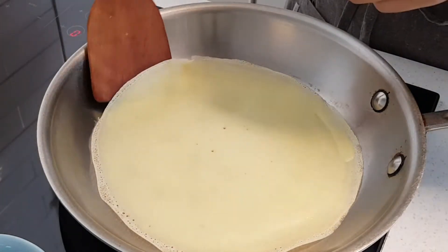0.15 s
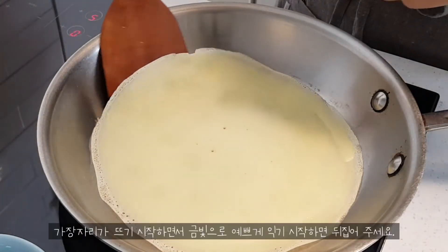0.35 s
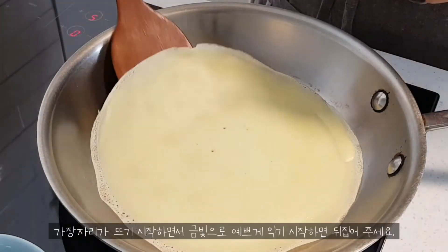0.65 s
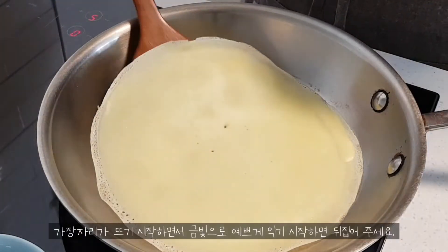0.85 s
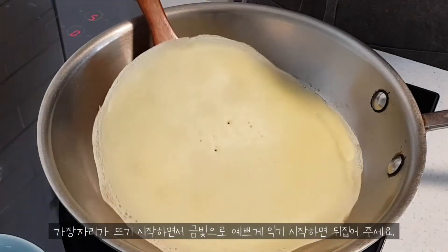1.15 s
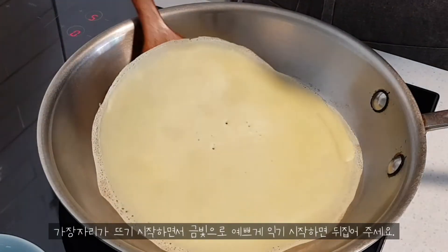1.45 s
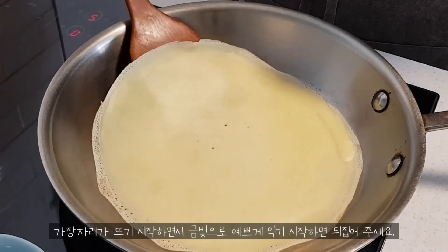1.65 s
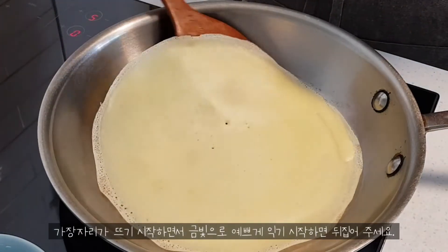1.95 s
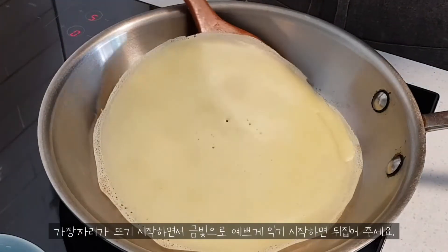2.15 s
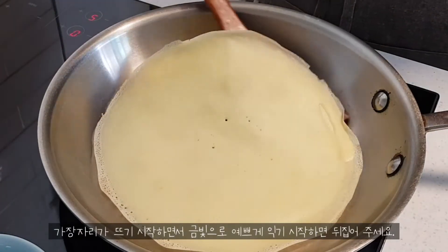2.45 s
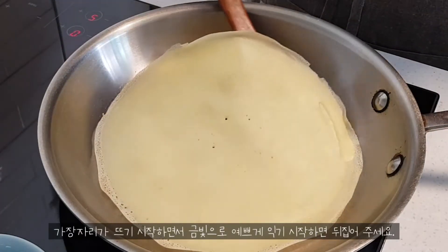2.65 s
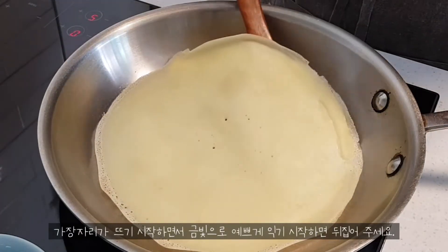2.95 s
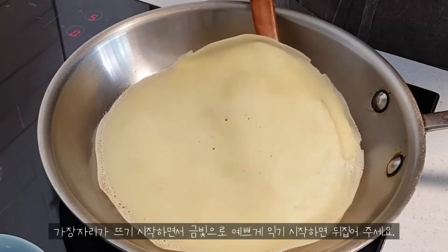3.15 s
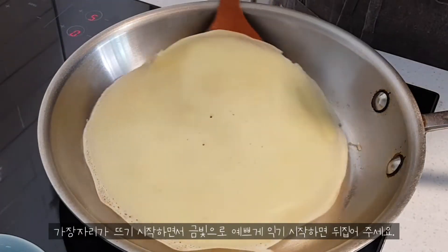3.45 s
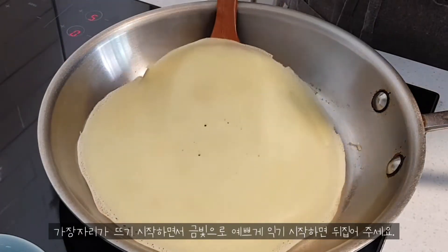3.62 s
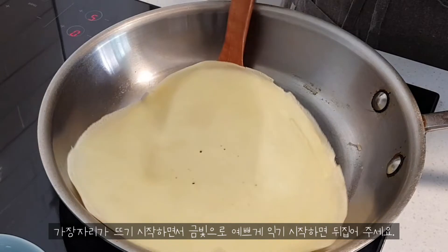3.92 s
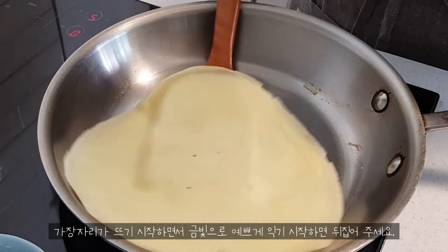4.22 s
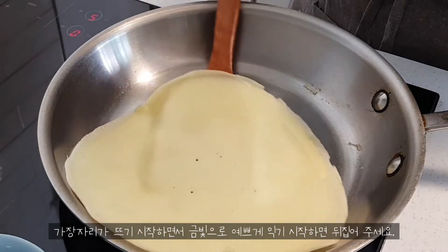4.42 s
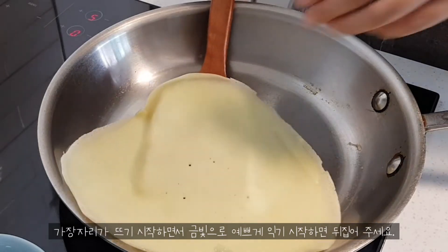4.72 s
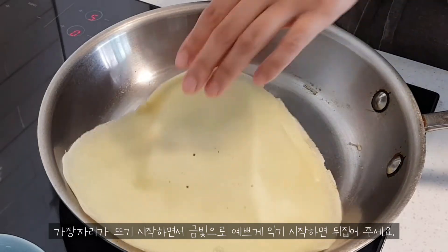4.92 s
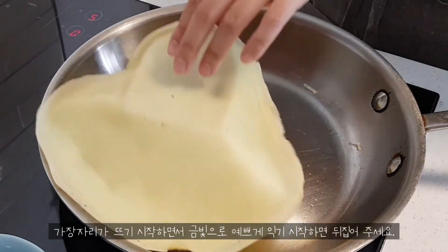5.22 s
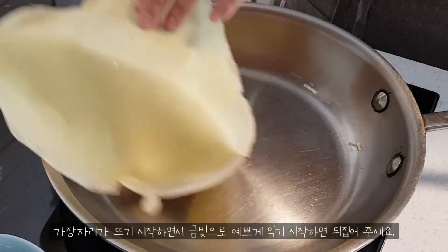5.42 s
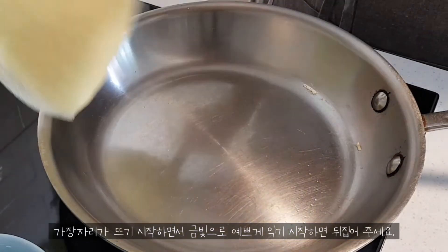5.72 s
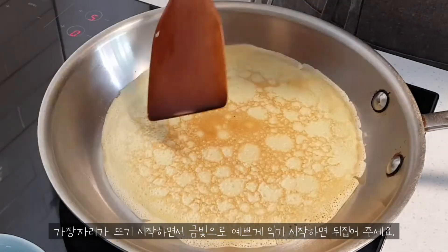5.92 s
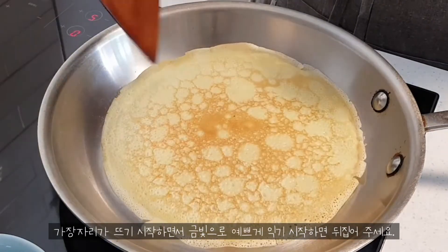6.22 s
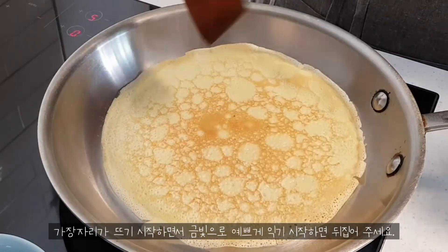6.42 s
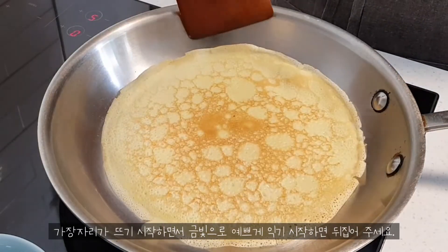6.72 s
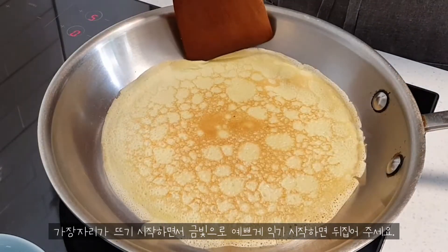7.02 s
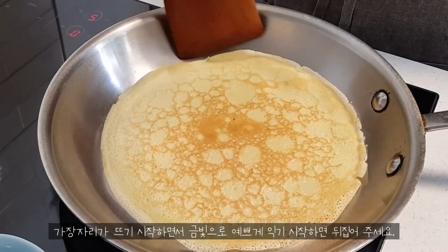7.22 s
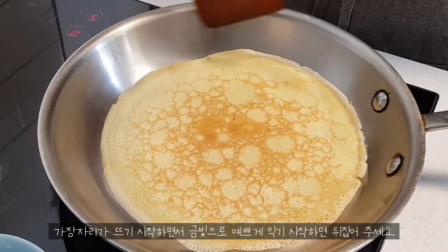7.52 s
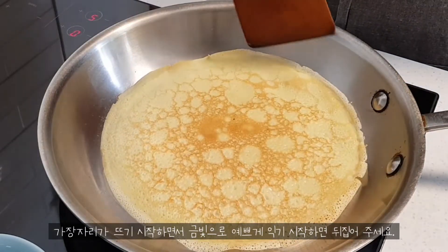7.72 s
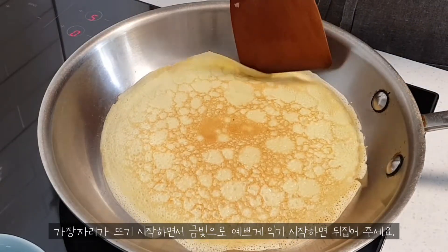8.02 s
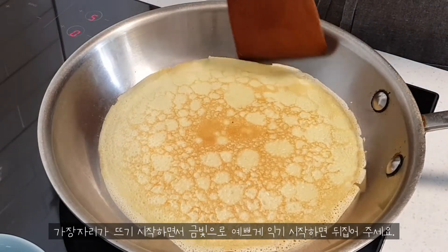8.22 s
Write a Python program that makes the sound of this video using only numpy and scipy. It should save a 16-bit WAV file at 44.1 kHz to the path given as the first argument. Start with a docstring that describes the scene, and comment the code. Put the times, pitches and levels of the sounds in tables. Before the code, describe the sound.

A steady, low, slightly wavering extractor hum and a faint hiss of hot fat run throughout in a small, short-echo kitchen. At 0.2 s a wooden spatula cracks against the steel pan wall with a short damped clang, and the pan thuds softly on the stove, again around 1.0 to 1.3 s. Two close knocks come at 1.5 to 1.6 s. Until about 4.8 s, brief gritty scrapes with fluttering metallic singing alternate with tiny crisp spits. From 4.0 to 4.8 s the handle rattles on the rim in quick hollow woody taps. Things grow quieter until 5.9 s, when the pancake lands in a soft, lumpy wet slap. Fresh sizzle and rustle swell unevenly. Lighter knocks follow at 6.6, 7.6 and 7.7 s, with a very faint dull one at 8.0 s. Close stereo, with the left stronger.

```python
"""A small kitchen: a wooden spatula works a thin pancake loose in a steel frying pan over an extractor hum.
The spatula knocks the wall (noisy crack, pan modes), slides (rubbing noise, treble hiss, blade resonances)
and rattles on the rim (short wood modes). The flipped pancake slaps down in noise puffs; fat sizzles as lumpy
noise and spits in ticks; the pan thuds on the stove. Two spaced microphones, the right one much weaker."""
import sys
import numpy as np
from scipy import signal
from scipy.fft import rfft, irfft, next_fast_len
from scipy.io import wavfile
from scipy.ndimage import uniform_filter1d, map_coordinates

SR = 44100
rng = np.random.default_rng(int(sys.argv[2]) if len(sys.argv) > 2 else 0)


def store_wav(level_fs):
    """Save 16-bit WAV to argv[1]."""
    pcm = np.round(np.clip(np.atleast_2d(level_fs), -1, 1) * 32767)
    wavfile.write(sys.argv[1], SR, pcm.T.astype(np.int16))


N = 368676

# All levels are relative: a sound may add an offset, and record() lifts the whole mix.
# Steady frying, down while the pancake is in the air, fresh after it lands:
# [t/s, sizzle level/dB, lower rustle level/dB]
FRYING_LEVELS = [(0, -74, -76), (2.2, -84, -81), (2.3, -68, -67), (3.6, -62, -72), (3.68, -75, -84),
                 (4.0, -65, -68), (4.8, -76, -64), (4.9, -71, -82), (5.24, -68.5, -78.5), (5.3, -85, -81.5),
                 (5.7, -79, -78), (5.87, -57.5, -70), (6.0, -63, -60), (6.2, -56, -58), (6.6, -65, -74.5),
                 (6.8, -63, -65.5), (6.95, -58.5, -66.5), (7.35, -61.5, -66), (7.55, -67.5, -77),
                 (7.85, -56.5, -55), (8.0, -59, -75), (8.2, -60.5, -68.5), (8.36, -70, -77)]
# The blade slides under the edge: [t/s, length/s, rubbing level/dB, treble hiss level/dB, swell/(dB/s),
# lower singing/dB against rubbing, upper singing/dB against rubbing]
BLADE_STROKES = [(0, 0.06, -63.5, -72, -30, 0.5, -22), (0.252, 0.17, -55.5, -48.5, -19, -3.5, -22),
                 (0.493, 0.14, -66.5, -55.5, 42, -1, -18), (0.685, 0.07, -53.5, -53, 9, -13, -19),
                 (0.884, 0.079, -54.5, -49.5, 10, -8.5, -11), (1.043, 0.043, -62.5, -61.5, 5, -4.5, -17),
                 (1.164, 0.022, -58.5, -60, 5, -7, -17), (1.272, 0.064, -60, -59.5, -30, -3, -17),
                 (1.393, 0.17, -66.5, -64.5, 53, -5, -4), (1.62, 0.12, -61, -57, -15, 0, -15),
                 (1.792, 0.062, -59.5, -54, 22, -4, -16), (1.93, 0.099, -67, -62, -13, -4, -20),
                 (2.09, 0.041, -61, -57, 20, -1.5, -22), (2.259, 0.12, -65.5, -58, -20, -9, -25),
                 (2.435, 0.11, -60, -56, -49, -2.5, -24), (2.624, 0.053, -65.5, -55, 5, -2, -22),
                 (2.75, .08, -68.5, -66, -10, 2, -20), (2.85, 0.023, -59, -53, 5, -1.5, -20),
                 (3.005, 0.069, -63.5, -63, 67, -2.5, -29), (3.118, 0.14, -71.5, -60.5, 7, 1, -21),
                 (3.293, 0.15, -60, -62.5, 9, -0.5, -19), (3.47, 0.15, -59.5, -61.5, -22, -8, 0),
                 (3.733, 0.045, -58.5, -56.5, -10, -1.5, -5), (3.888, 0.033, -62, -56.5, -10, -5, -6),
                 (4.007, 0.03, -61.5, -54, 5, 3, -15), (4.12, 0.095, -55.5, -55.5, 3, 0.5, -8),
                 (4.264, 0.22, -62.5, -56, -8, 0, -18), (4.457, 0.31, -63, -60.5, -12, -6, -28)]
# Likeness of the two microphones: [f/Hz, likeness 0 to 1]
MIC_LIKENESS = [(60, 0.84), (150, 0.97), (380, 0.77), (950, 0.086), (2400, 0.042), (6000, .01)]


def amp(db):
    """Gain of a level in dB."""
    return 10 ** (np.asarray(db) / 20)


def unit(x):
    """x at rms 1."""
    return x / np.sqrt(np.mean(x ** 2) + 1e-20)


def along(points, hz):
    """(Hz, value) points read on a log frequency axis."""
    f, v = np.transpose(points)
    return np.interp(np.log(hz + 1), np.log(f + 1), v)


def wobble(rate):
    """A smooth random curve, rate knots a second."""
    knots = rng.standard_normal(int(N * rate / SR) + 4)
    return map_coordinates(knots, [np.arange(N) * rate / SR])


def filtered(x, response):
    """x filtered by a response over frequency."""
    m = next_fast_len(x.shape[-1] + 8192)
    spectrum = rfft(x, m) * response(np.fft.rfftfreq(m, 1 / SR))
    return irfft(spectrum, m)[..., :x.shape[-1]]


def tilt(db_octave, low_hz):
    """A spectral slope about 1 kHz with the bass taken out below low_hz."""
    def response(hz):
        slope = amp(db_octave * np.log2(np.maximum(hz, low_hz) / 1000))
        return slope * hz ** 2 / np.sqrt(hz ** 4 + low_hz ** 4)
    return response


def resonance(hz, centre_hz, half_width_hz):
    """Gain of a band that falls to half at half_width_hz from its centre."""
    return 1 / (1 + ((hz - centre_hz) / half_width_hz) ** 2)


def hump(hz, centre_hz, curve_db):
    """Gain of a band that falls by curve_db one octave from its centre, four times that at two."""
    return amp(-curve_db * np.log2((hz + 1) / centre_hz) ** 2)


def mic_angle(hz):
    """Angle between the microphones, from their likeness."""
    return np.arccos(np.clip(along(MIC_LIKENESS, hz), 0, 1))


def rush(gain, size=N):
    """Coloured noise of rms 1 at both microphones, alike in the bass and nearly unrelated in the treble."""
    def mid_side(hz):
        turn = mic_angle(hz) / 2
        return gain(hz) * [np.cos(turn), np.sin(turn)]
    mid, side = filtered(rng.standard_normal((2, size)), mid_side)
    return unit(np.array([mid + side, mid - side]))


def ring(hz, db, t60, t, attack=0.001):
    """One dying mode; its phase differs more between the microphones where they are less alike."""
    apart = mic_angle(hz) * rng.choice([-.5, .5])
    phase = 2 * np.pi * (hz * t + rng.random()) + np.array([[apart], [-apart]])
    return amp(db - 60 * t / t60) * (1 - np.exp(-t / attack)) * np.sin(phase)


def add(track, s, sound):
    """Mix a sound into the track at s seconds."""
    part = track[:, round(s * SR):][:, :sound.shape[1]]
    part += sound[:, :part.shape[1]]


def level(rows):
    """Gain per sample for each dB column of a curve."""
    s, *columns_db = np.transpose(rows)
    return [amp(np.interp(np.arange(N) / SR, s, db)) for db in columns_db]


def stroking(levels_db):
    """Gain per sample: each stroke rises, swells or fades along its length, and dies away."""
    rise_db_per_s, fall_db_per_s = 399, 320
    t, power = np.arange(0, N, 32) / SR, 0
    for (s, length, _, _, swell_db, *_), db in zip(BLADE_STROKES, levels_db):
        before = rise_db_per_s * np.maximum(s - t, 0)
        after = fall_db_per_s * np.maximum(t - s - length, 0)
        swell = swell_db * np.clip(t - s, 0, length)
        power = power + amp(db + swell - before - after) ** 2
    return np.interp(np.arange(N) / SR, t, np.sqrt(power))


def treble_gain():
    """Gain of the treble hiss: frying, plus the blade's hiss against the crisp edge in each stroke."""
    hiss_db = np.transpose(BLADE_STROKES)[3]
    return np.hypot(level(FRYING_LEVELS)[0], stroking(hiss_db))


def kitchen(x):
    """The room's answer, 5 ms late: noise in which each frequency dies at its own speed."""
    # Reverberation: [f/Hz, t60/s]
    room_decay = [(200, 0.57), (2000, 0.13), (10000, 0.17)]
    hz, t, z = signal.stft(rush(np.ones_like, SR // 2), SR, nperseg=256)
    decay = amp(-60 * t / along(room_decay, hz)[:, None])
    tail = signal.istft(z * decay, SR, nperseg=256)[1]
    late = np.pad(x, ((0, 0), (220, 0)))
    return signal.fftconvolve(late, tail / np.linalg.norm(tail[0]), axes=1)[:, :N]


def fan():
    """Extractor fan: broad air noise with fuzzy hum bands that waver in level."""
    # Colour of the steady air noise: [f/Hz, level/dB]
    air_colour = [(12, -40.5), (20, -26.5), (54, -5), (85, -14), (119, -2.5), (147, -10.5), (267, -16.5),
                  (303, -20.5), (504, -26.5), (637, -21), (709, -31), (1130, -28.5), (3200, -61),
                  (4160, -100), (7040, -120)]
    # Fuzzy hum bands: [f/Hz, half-width/Hz, level/dB]
    hum_bands = [(60.4, 6.9, -54.5), (114.8, 3.7, -54.5), (222.2, 15.5, -65.5), (274.2, 20.5, -64.5),
                 (624, 26, -78)]
    air = amp(-52.5 + 1.1 * wobble(4.7)) * rush(lambda hz: amp(along(air_colour, hz)))
    for centre_hz, half_width, db in hum_bands:
        hum = rush(lambda hz: resonance(hz, centre_hz, half_width))
        air += amp(db + 2.2 * wobble(2.5)) * hum
    return air


def sizzle():
    """Frying and the blade's treble hiss: noise in dense tiny bursts, over a faint steady hiss of hot fat."""
    # Colour of the bursts: [f/Hz, level/dB]
    burst_colour = [(1470, -37), (2500, -11.5), (3830, -7), (4410, -6.5), (6860, -10), (7830, -1),
                    (13000, -1), (14900, -4), (16000, -12)]
    # Colour of the faint hiss of hot fat: [f/Hz, level/dB]
    hiss_colour = [(1650, -37.5), (2800, -15.5), (7070, -12), (8300, -3.5), (14900, -2), (16000, -4.5)]
    bursts = amp(0.52 * wobble(45) + 1.6 * wobble(400) + 2.0 * wobble(15))
    steady = amp(-72.5) * rush(lambda hz: amp(along(hiss_colour, hz)))
    return steady + treble_gain() * unit(bursts * rush(lambda hz: amp(along(burst_colour, hz))))


def spits():
    """Spits of fat and other small ticks: each a sharp noise tick with a short hiss in the same band."""
    # Single spits and ticks, loud and faint, with two small rustles at 6.298 and 7.045 s:
    # [t/s, level/dB, centre f/Hz]
    single_ticks = [(.5383, -29, 14600), (0.617, -28, 10900), (0.778, -29, 13000), (0.888, -35, 10700),
                    (.9715, -41, 10700), (1.8117, -31, 14700), (1.8452, -29.5, 11900), (2.3034, -32, 15000),
                    (2.4125, -31, 12500), (2.53, -36, 13100), (2.6217, -31.5, 13400), (2.689, -26, 14600),
                    (2.7427, -36, 12100), (2.8675, -28.5, 4700), (2.989, -35.5, 13600),
                    (3.0577, -33.5, 8280), (3.1152, -23, 14300), (3.187, -31, 12500), (3.3134, -34, 9050),
                    (4.148, -28, 12600), (4.296, -25.5, 13200), (4.368, -29, 14100), (4.4048, -19.5, 13000),
                    (5.2385, -48, 8600), (5.549, -37.5, 9800), (5.835, -39, 8130), (6.165, -26, 6400),
                    (6.298, -46, 4200), (6.4107, -31.5, 11100), (6.5028, -39, 9510), (6.867, -38.5, 7790),
                    (6.9205, -38.5, 4700), (6.952, -37, 9700), (7.045, -42, 3200), (7.337, -40, 10800),
                    (7.831, -33.5, 8100)]
    out, t = np.zeros((2, N)), np.arange(SR // 8) / SR
    gain = treble_gain()
    chance_ticks = []
    for when, strength, pitch in rng.random((60, 3)):  # at random times, following the treble hiss
        hiss_db = 20 * np.log10(gain[int(when * N)])
        chance_ticks.append((when * N / SR, hiss_db + 14 + 8 * strength, 8000 + 7000 * pitch))
    for s, db, centre_hz in single_ticks + chance_ticks:
        tick = amp(db - 26.5 - 60 * t / 0.005)
        hiss = amp(db - 12 - 60 * t / 0.049)
        add(out, s, rush(lambda hz: hump(hz, centre_hz, 6), len(t)) * (tick + hiss))
    return out


def bumps():
    """The pan shifts on the stove: soft low modes of the stove top, each with a dull rub of the pan's base."""
    # Bumps: [t/s, thud level/dB, lean to the higher modes/(dB/octave), rub level/dB]
    pan_bumps = [(.217, -33, 1.5, -39.5), (.985, -21, 9, -52.5), (1.036, -21, 8, -47),
                 (1.093, -26, -1, -62), (1.228, -29, 4, -49.5), (1.296, -33, 0, -75),
                 (1.528, -24, -1.5, -48), (2.459, -57, 7, -48), (2.521, -53, 6, -50), (4.04, -38, 2, -52),
                 (4.174, -38, -1.5, -52.5), (4.411, -40, .3, -51), (4.533, -38.5, -2, -52.5),
                 (4.765, -36, -4.5, -50.5), (5.913, -39.5, -8.5, -42), (7.271, -38, 1, -67),
                 (7.581, -37, 8, -50), (7.77, -41, 7, -47)]
    # Modes of the stove top: [f/Hz, t60/s]
    stove_modes = [(48, 0.18), (97, 0.17), (140, 0.19)]
    out, t = np.zeros((2, N)), np.arange(SR // 2) / SR
    for s, db, lean_db, rub_db in pan_bumps:
        thud = sum(ring(hz, db + lean_db * np.log2(hz / 97), t60, t, attack=0.0094)
                   for hz, t60 in stove_modes)
        rub = rush(lambda hz: hump(hz, 280, 14), len(t))
        rub_gain = amp(rub_db - 60 * t / 0.3) * (1 - np.exp(-t / 0.003))
        add(out, s, thud + rub_gain * rub)
    return out


def slap():
    """The pancake lands in stages: noise puffs of trapped air and wet contact, with no ring."""
    # Stages: [t/s, level/dB, rise/s, t60/s, brightness/(dB/octave)]
    landing = [(5.887, -44, .002, 0.11, 9), (5.896, -33.5, 0.0036, 0.14, 1.5),
               (5.909, -13.5, 0.0056, 0.059, -1.5), (5.917, -21, 0.001, 0.055, 1),
               (5.946, -26, 0.0076, 0.057, 0.5), (5.95, -44, 0.011, 0.45, -1)]
    # Colour of the puffs: [f/Hz, level/dB]
    puff_colour = [(180, -35), (300, -17), (787, -20.5), (1060, -4), (2100, -11), (2930, -6), (5700, -19.5),
                   (13100, -20), (16000, -29)]
    out, t = np.zeros((2, N)), np.arange(SR // 3) / SR
    for s, db, rise, t60, bright_db in landing:
        puff = rush(lambda hz: amp(along(puff_colour, hz) + bright_db * np.log2((hz + 1) / 1000)), len(t))
        # contacts come in lumps
        crackle = amp(7.75 * uniform_filter1d(rng.standard_normal(len(t)), size=16))
        envelope = amp(db - 60 * t / t60) * np.minimum(t / rise, 1)
        add(out, s, envelope * unit(crackle) * puff)
    return out


def scrape():
    """Gritty rubbing, also the rustle of frying; the blade sings in two groups of fluttering resonances."""
    # Colour of the rubbing: [f/Hz, level/dB]
    rub_colour = [(410, -44.5), (700, -11), (1130, -4), (1240, -2), (1480, -3.5), (1980, -5), (2780, -9.5),
                  (3820, -12), (4760, -8.5), (7000, -19.5), (9100, -37), (15400, -120)]
    # Blade on steel, lower then upper group of resonances: [f/Hz, half-width/Hz, level/dB]
    blade_groups = [
        [(1258, 21, -7.5), (1830, 90, -3.5), (1998, 43, -3), (2515, 56, -10)],
        [(4440, 120, -7.5), (4830, 130, -5)],
    ]
    _, _, rub_db, _, _, *groups_db = np.transpose(BLADE_STROKES)
    grit = amp(2.1 * wobble(60) + 1.8 * wobble(350) + 1.2 * wobble(12))
    rubbing = unit(grit * rush(lambda hz: amp(along(rub_colour, hz))))
    out = np.hypot(stroking(rub_db), level(FRYING_LEVELS)[1]) * rubbing
    for singing_db, group in zip(groups_db, blade_groups):
        gain = stroking(rub_db + singing_db)
        for centre_hz, half_width, db in group:
            slips = amp(2.5 * wobble(15) + 2.5 * wobble(90))  # each resonance slips in and out
            tone = rush(lambda hz: resonance(hz, centre_hz, half_width))
            out += gain * amp(db) * unit(slips * tone)
    return out


def taps():
    """The handle rattles on the rim: two low and two upper wood modes, a hollow knock and a click."""
    # Taps: [t/s, lowest mode level/dB, second mode level/dB, upper modes level/dB]
    rim_taps = [(1.162, -39, -34.5, -42.5), (1.262, -50, -42, -52), (3.746, -41, -68, -63),
                (3.999, -40.5, -44, -40), (4.037, -32.5, -52, -30), (4.089, -40.5, -43, -54),
                (4.113, -42.5, -55, -33), (4.172, -29, -33.5, -24.5), (4.23, -44.5, -54, -33.5),
                (4.297, -51, -53, -42), (4.353, -50, -55, -36), (4.413, -30.5, -43, -31),
                (4.463, -49, -63, -31.5), (4.532, -31.5, -46, -28.5), (4.577, -44, -54, -31),
                (4.656, -32.5, -37, -29.5), (4.697, -44, -53, -33.5), (4.767, -34, -36, -31.5)]
    # Modes of the spatula, lower pair then upper pair: [f/Hz, level/dB, t60/s]
    wood_modes = [(990, 1.5, .04), (1260, 1.5, .025), (1870, -1.5, .022), (2010, -1.5, .03)]
    out, t = np.zeros((2, N)), np.arange(SR // 6) / SR
    for s, db, second_db, upper_db in rim_taps:
        lifts_db = [db, second_db, upper_db, upper_db]
        detune = rng.normal(1, .015, size=len(wood_modes))
        # upper modes sink by 0.11 a second as the handle slides along the rim
        detune[2:] *= 1 - 0.11 * np.clip(s - 4.3, -.3, .5)
        sound = sum(ring(hz * d, mode_db + lift, t60, t, attack=0.00028)
                    for (hz, mode_db, t60), lift, d in zip(wood_modes, lifts_db, detune))
        # hollow knock: a noise band around each pair of modes
        sound += amp(upper_db - 10.5 - 60 * t / 0.054) * rush(lambda hz: hump(hz, 1900, 40), len(t))
        sound += amp(db - 14 - 60 * t / 0.085) * rush(lambda hz: hump(hz, 1000, 60), len(t))
        click = rush(tilt(-8.5, low_hz=2330), len(t))
        sound += amp(upper_db - 15.5 - 60 * t / 0.037) * click
        add(out, s, sound)
    return out


def knocks():
    """Wood on the steel wall: noisy crack, dull clang and woken pan modes, ducked 18 dB by the next blow."""
    # Blows: [t/s, crack level/dB, brightness/(dB/octave), damping by the blade (divides t60),
    # ring level/dB, height on the wall, slant of the blade, place round the rim]
    wall_blows = [(.217, -15, -0.5, 1.92, -37, -0.062, -1.48, -.1),
                  (1.53, -15, -5.5, 2, -38, 1.5, 0.16, -.35),
                  (1.597, -18, -2.5, 1.01, -43.5, 0.42, .06, 0.76),
                  (6.633, -23.5, -1.5, 0.93, -42.5, -0.5, 0.46, -0.27),
                  (7.576, -21, 1, 0.77, -45, -0.63, 0.37, -0.12),
                  (7.718, -24, -7.5, 1.83, -41, 0.46, 0.57, -0.34),
                  (8.033, -48, -20, 1.63, -53, -0.46, 0.73, -0.25)]
    # Modes of the pan, twelve long ones first: [f/Hz, t60/s before damping]
    pan_modes = [(328, .24), (420, .16), (657, .26), (781, .33), (985, .22), (1335, .34), (1990, .42),
                 (2350, .18), (2735, .36), (3542, .42), (4660, .2), (5780, .18), (255, .08), (1098, .07),
                 (1257, .08), (1536, .09), (1905, .17), (3900, .1), (5360, .11), (6965, .1), (8060, .07)]
    # How a blow wakes each long mode: [level/dB, dB per unit of height, of slant, of place]
    mode_waking = [(8.5, -6.5, -0.1, 3), (6, 2, -1.8, -13.5), (2.5, -1, 8, 2.5), (-3.5, -12.5, -4, -7),
                   (-1.5, 9.5, 5, 5.5), (5.5, 4.5, -2.1, -4.5), (-1.5, 4.5, -4.5, 9.5), (-3, -4, 2.2, 6.5),
                   (5, 0.2, 3.5, -6), (-7, 6, -5.5, 11), (1.9, 2, -8, 0.5), (-8.5, 5, -2, -8.5)]
    out, t = np.zeros((2, N)), np.arange(SR // 2) / SR
    next_blows = wall_blows[1:] + [[np.inf]]
    for (s, db, bright_db, damping, ring_db, height, slant, place), after in zip(wall_blows, next_blows):
        bright = tilt(bright_db, low_hz=750)
        crack = rush(lambda hz: bright(hz) / (1 + (hz / 12000) ** 4), len(t))
        clang = rush(tilt(bright_db - 6.5, low_hz=755), len(t))
        sound = amp(db - 6.5 - 60 * t / 0.065) * crack
        sound += amp(db - 17.5 - 60 * t / 0.21) * clang

        # a blow duller than -5 dB an octave also loses its high modes
        dull_db = min(bright_db + 5, 0)
        woken_db = []
        for (hz, _), (base, up, lean, turn) in zip(pan_modes, mode_waking):
            struck_db = base + height * up + slant * lean + place * turn
            woken_db.append(ring_db + struck_db + dull_db * np.log2(max(hz / 800, 1)))
        for hz, _ in pan_modes[len(mode_waking):]:  # short modes follow the crack
            woken_db.append(db - 19.5 - 3 * np.log2(hz / 1000) + rng.normal(0, 4.8))

        for (hz, t60), mode_db in zip(pan_modes, woken_db):
            # a round pan has close pairs of modes that beat
            beat = 1 + .45 * np.cos(2 * np.pi * (rng.uniform(10, 35) * t + rng.random()))
            sound += beat * ring(hz, mode_db, t60 / damping, t)
        mute = amp(-18 * np.clip((s + t - after[0]) / .03, 0, 1))
        add(out, s, sound * mute)
    return out


def scene():
    """Knocks, taps, slap and spits with their room, over bumps, sizzle, scraping and fan."""
    blows = knocks() + taps() + slap() + spits()
    return blows + amp(-11) * kitchen(blows) + bumps() + sizzle() + scrape() + fan()


def record(dry):
    """Both microphones get 4.5 dB of gain, the right one is weaker, and a steep low-pass cuts at 15.6 kHz."""
    # Right microphone against the left: [f/Hz, level/dB]
    right_mic = [(60, -10.5), (180, -6.5), (450, -14.5), (1200, -10), (5000, -11), (9000, -8.5),
                 (15000, -6.5)]

    def response(hz):
        mics = amp(4.5 + np.array([0 * hz, along(right_mic, hz)]))
        return mics / (1 + (hz / 15600) ** 300)
    return filtered(dry, response)


dry = scene()
out = record(dry)
store_wav(out)
```